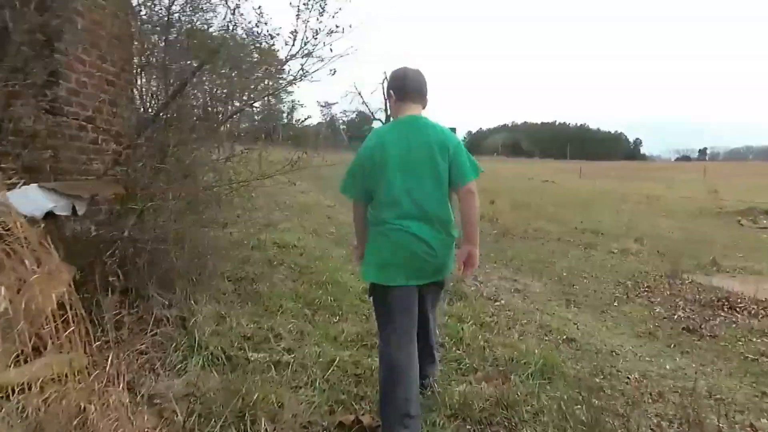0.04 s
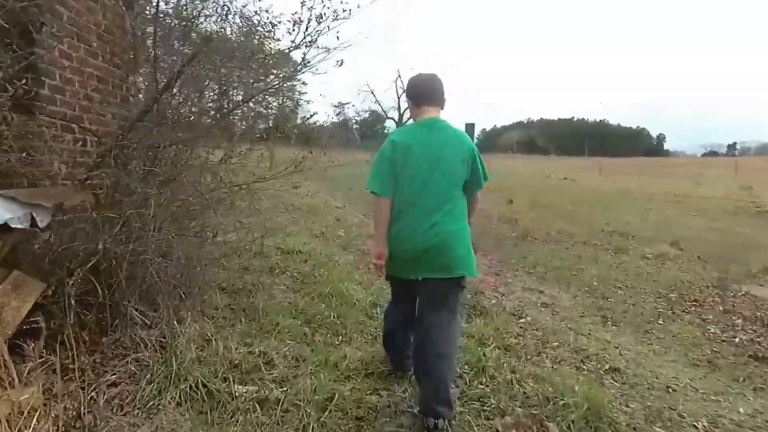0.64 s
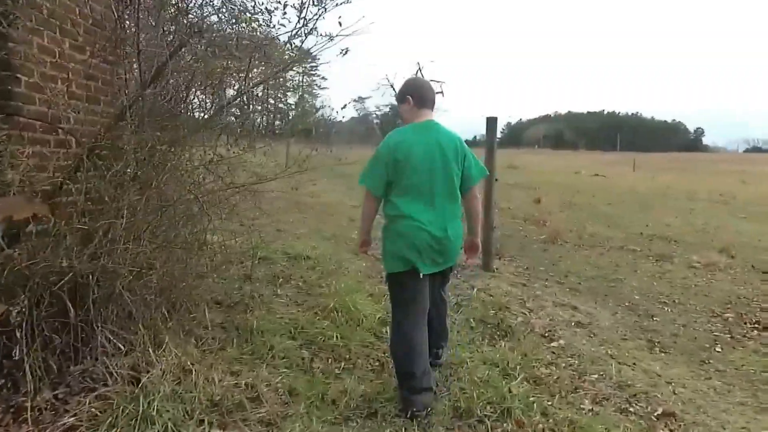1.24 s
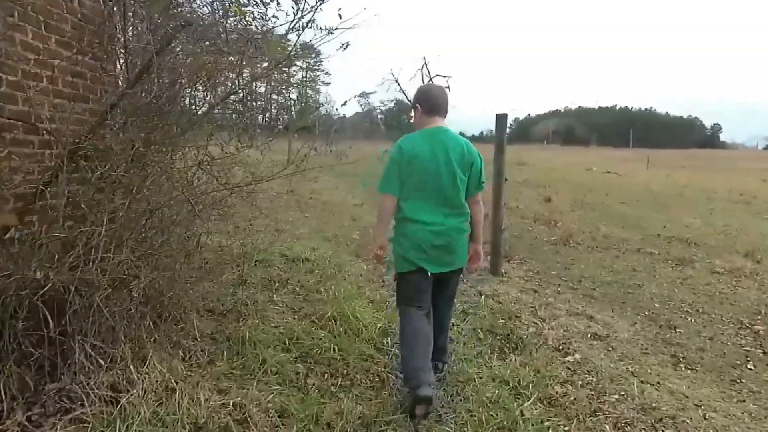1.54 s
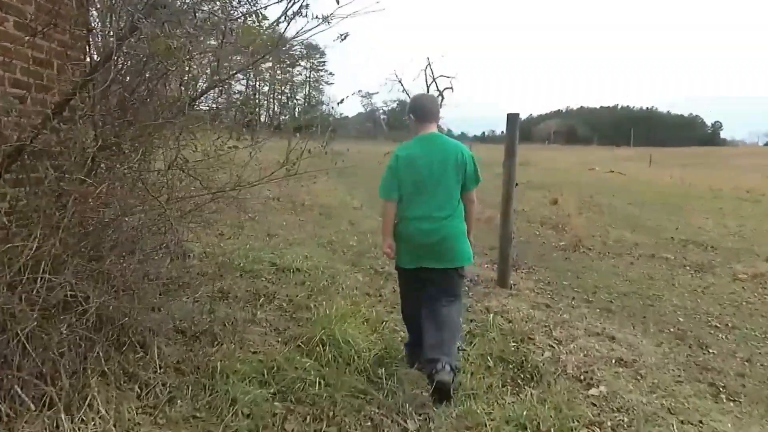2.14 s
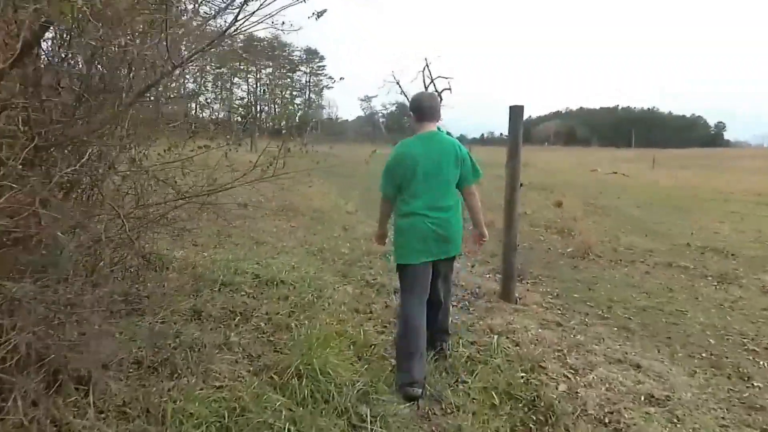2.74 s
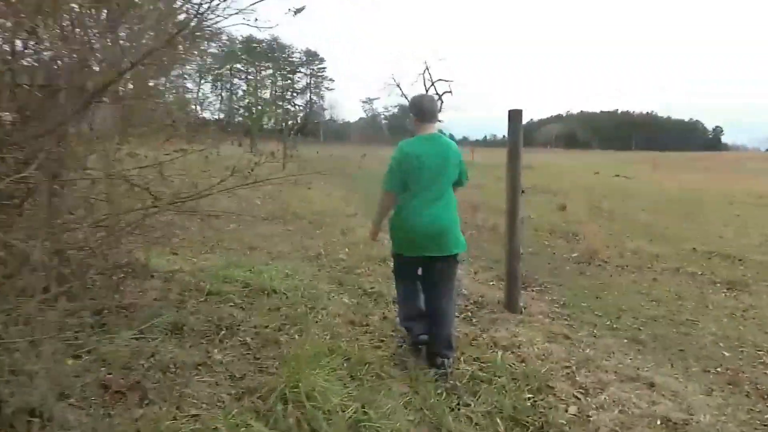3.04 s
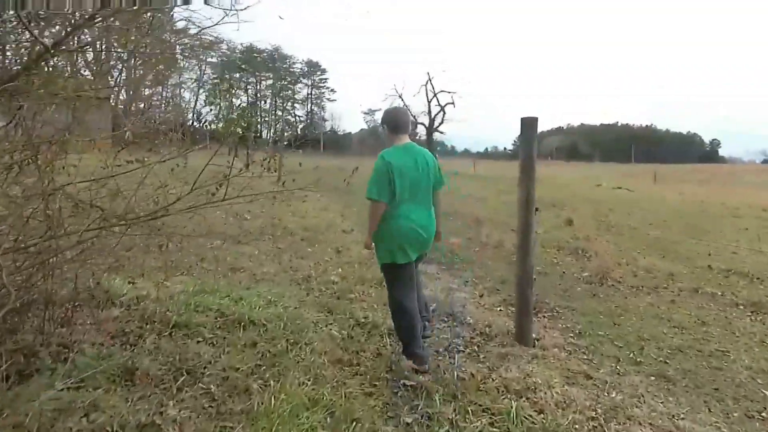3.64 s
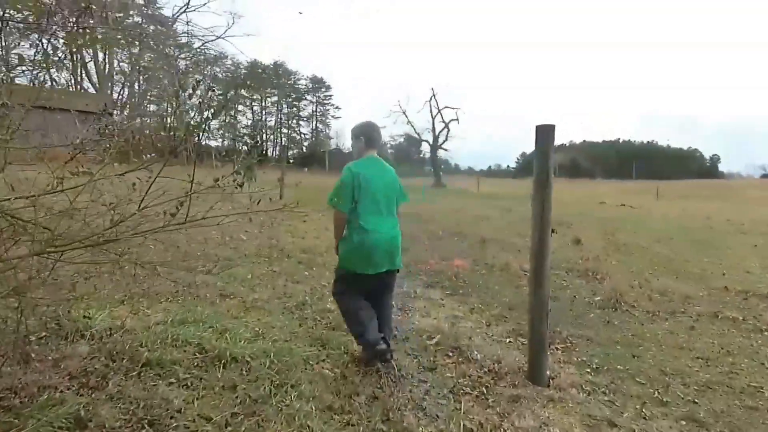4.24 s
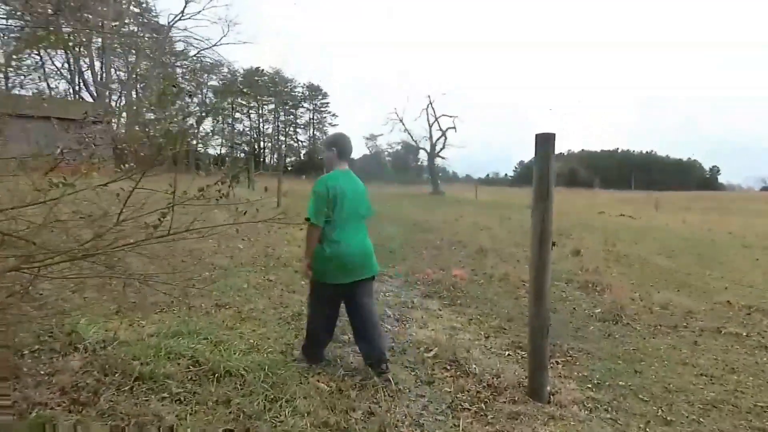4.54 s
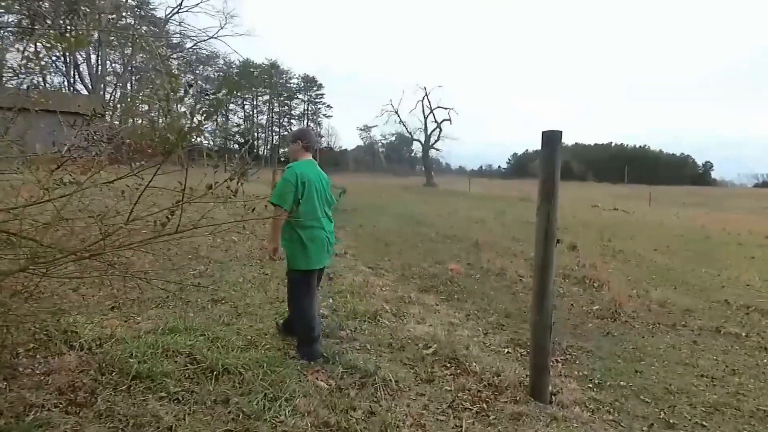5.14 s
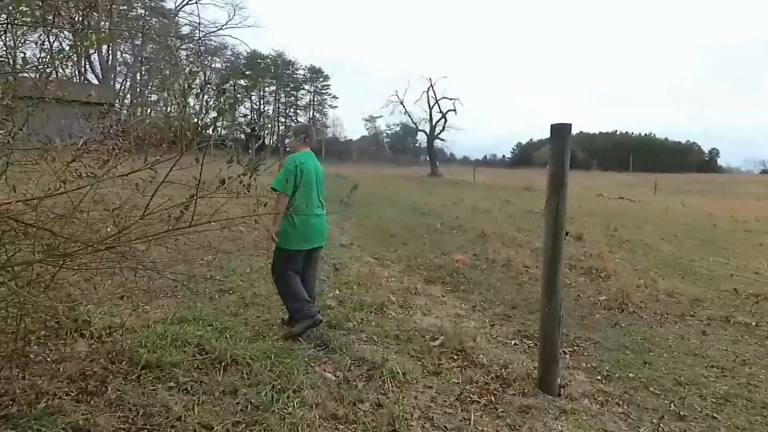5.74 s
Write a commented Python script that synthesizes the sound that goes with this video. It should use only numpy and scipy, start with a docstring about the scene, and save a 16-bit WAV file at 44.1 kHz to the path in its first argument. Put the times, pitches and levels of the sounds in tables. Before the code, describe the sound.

Someone walks slowly across a field, dry leaves and grass crunching underfoot close by on the right, a shoe squeaking briefly.

```python
"""A foot crunches into dry grass and fallen leaves: slow steps in an open field, the microphone of a
carried camera close to the ground. Each step crushes a dense mass of blades; leaves cave in, stalks
snap as the foot lifts and swings, and soles thud on the soil. In one step a shoe squeaks and creaks,
then a dry stem drags along it. The walk is all in the right channel; the left has only a faint hiss."""
import sys
import numpy as np
from scipy import signal
from scipy.fft import rfft, irfft, next_fast_len
from scipy.io import wavfile
from scipy.ndimage import map_coordinates

SR = 44100
rng = np.random.default_rng(int(sys.argv[2]) if len(sys.argv) > 2 else 0)


def int16_out(signal):
    """Quantize to a 16-bit WAV file."""
    q = np.round(np.clip(np.atleast_2d(signal).T, -1, 1) * 32767)
    wavfile.write(sys.argv[1], SR, q.astype(np.int16))


N = 264908

# bright spectrum of dry blades and leaves breaking close by: (frequency [Hz], relative level [dB])
LEAF_SPECTRUM = [(300, -34.5), (1000, -17), (2100, -6), (2900, -6.5), (3550, -8), (4800, -2), (6700, 0),
                 (10000, 0), (15000, -0.2)]
# dull spectrum of litter crushed under the sole: (frequency [Hz], relative level [dB])
SOLE_SPECTRUM = [(25, -31), (70, -13.5), (130, -5.5), (220, 1), (500, -0.5), (1000, -2), (1800, -6.5),
                 (3500, -6), (9000, -18.5)]


def footsteps():
    """More pressure breaks more blades a second, until single ticks merge into one dense crunch."""
    crunch_db, sole_db = tread() + 0.63 * wobble(35)  # the litter lies unevenly
    fractures_per_s = 5000 * amp(1.35 * (crunch_db + 18.5))
    grains = crackle(fractures_per_s, spread_db=4.5, life_s=0.00036)
    sliding = rng.standard_normal(N)  # blades sliding on the shoe
    clumps = unit(wobble(170) + wobble(70))  # blades give way in small bunches
    bright = coloured(grains + amp(1) * sliding, LEAF_SPECTRUM)
    bright = shifting_hollows(bright, treble_share=0.34, width_hz=299.4, life_s=.06)
    pressed = crackle(fractures_per_s * .3, spread_db=1.5, life_s=0.00045)
    dull = coloured(pressed + amp(-6.5) * grains + amp(3.5) * sliding, SOLE_SPECTRUM)
    dull = shifting_hollows(dull, treble_share=.6, width_hz=153.2, life_s=.04)
    dull_gain = amp(sole_db + 0.39 * clumps + 0.74 * wobble(60))
    return amp(crunch_db + 1.2 * clumps) * bright + dull_gain * dull


def tread():
    """Crunch and dull crush in dB: each foot brushes, presses, lands and fades, with swishes between."""
    # a foot bearing down:
    # (time [s], hold [s], crunch [dB], dull crush re crunch [dB], fade [dB/s], brushing beforehand [s])
    footfalls = [(0.002, .04, -20, -10, 140, 0), (.503, .156, -21, -12.5, 85, .097),
                 (1.21, .225, -21, -11.8, 170, .011), (1.9, .2, -22.5, -12.5, 380, .03),
                 (2.498, 0.2, -19.5, -15, 70, .035), (3.14, .203, -19.5, -13, 148, .014),
                 (3.832, .128, -19.5, -13, 75, .068), (4.427, .222, -17, -14, 78, .06),
                 (5.1, .105, -17.4, -12.5, 160, .055), (5.783, .157, -18.5, -12.4, 100, .05)]
    # a foot rolling off or swinging through the grass:
    # (time [s], hold [s], crunch [dB], dull crush re crunch [dB], fade [dB/s])
    swishes = [(.16, 0.085, -30.5, -11.5, 61), (.815, 0.052, -25, -13.5, 119),
               (.995, 0.056, -39, -9.5, 129), (1.642, .012, -33.5, -14.5, 300), (1.74, .04, -36, -12, 90),
               (2.136, .1, -26.5, -13, 63), (2.33, .02, -32, -17, 150), (2.796, 0.034, -22.5, -15, 150),
               (3.1, .015, -33, -11, 300), (3.422, 0.097, -26.5, -16, 260), (3.585, .11, -30.5, -9, 113),
               (4.092, 0.033, -25.5, -15.5, 250.5), (4.28, .03, -26.5, -12.5, 158),
               (4.816, 0.053, -24, -12.5, 480), (4.955, 0.041, -36.5, -7, 220),
               (5.323, 0.036, -21, -18, 180.5), (5.421, 0.055, -30, -13.5, 140),
               (5.689, 0.032, -32.5, -8.5, 100)]
    t = np.arange(N) / SR
    moves = [(db + stroke(s, hold, rise=350, fade=fade), dull) for s, hold, db, dull, fade in swishes]
    for s, hold, db, dull, fade, brush in footfalls:
        touch_db = stroke(s - brush, brush + hold, rise=1300, fade=fade)
        press_db = np.maximum(-8.5, stroke(s, hold, rise=260, fade=0))  # grazes the tips, then presses
        ease_db = 5 * np.maximum(t - s, 0)  # the litter packs down
        moves.append((db + touch_db + press_db - ease_db, dull))
    settle_db, settle_dull_db = -45, -51  # trodden litter springing back between steps
    crunch_power = amp(settle_db) ** 2 + sum(amp(db) ** 2 for db, dull in moves)
    sole_power = amp(settle_dull_db) ** 2 + sum(amp(db + dull) ** 2 for db, dull in moves)
    return 10 * np.log10(crunch_power), 10 * np.log10(sole_power)


def stroke(s, hold, rise, fade):
    """One movement in dB re its top, reached at time s; rise and fade are in dB a second."""
    t = np.arange(N) / SR - s
    return -rise * np.maximum(-t, 0) - fade * np.maximum(t - hold, 0)


def shifting_hollows(x, treble_share, width_hz, life_s):
    """Narrow hollows in the spectrum open and close as the foot shifts, most plainly below the treble."""
    hz, t, spectra = signal.stft(x, SR, nperseg=1024, noverlap=768)
    knots = rng.standard_normal((400, 400))
    field = map_coordinates(knots, np.meshgrid(hz / width_hz, t / life_s, indexing="ij"), mode="mirror")
    depth_db = 4.4 * np.interp(hz, [3500, 7000], [1, treble_share])[:, None]
    gain = amp(depth_db * (field - 0.27 * field ** 2))  # hollows go deeper than peaks rise
    gain /= np.sqrt(np.mean(gain ** 2, axis=1, keepdims=True))
    return unit(signal.istft(spectra * gain, SR, nperseg=1024, noverlap=768)[1][:N])


def leaf_crushes():
    """A whole leaf caves in with a tight swell of fractures."""
    # collapsing leaves: (middle time [s], relative level [dB], half length [s])
    collapses = [(0.02, -33, 0.0093), (0.191, -16.5, 0.0074), (0.316, -30, 0.0022), (0.65, -24.5, 0.0098),
                 (1.365, -24, 0.0053), (1.489, -27.5, .007), (1.991, -20.5, 0.006), (2.092, -21.5, 0.0072),
                 (2.939, -27.5, .003), (3.143, -21.5, 0.005), (3.646, -16.5, 0.0048),
                 (4.281, -25.5, 0.0078), (4.754, -23, 0.0043), (5.546, -33, 0.0043), (5.928, -13.5, 0.0055)]
    swell = sum(amp(db) * bump(s, half) for s, db, half in collapses)
    grains = crackle(5000, spread_db=-1, life_s=0.00029)
    return swell * (amp(2) * coloured(grains, LEAF_SPECTRUM) + amp(-11) * coloured(grains, SOLE_SPECTRUM))


def stalk_snaps(thin_per_s=12, tick_s=.0006, splinter_s=.003):
    """A stalk breaks with a sharp tick and a brief splintering; thin ones go at random."""
    # the loudest stalks breaking: (time [s], relative level [dB])
    loud = [(0.1445, -8), (0.994, -24), (1.1489, -26), (1.4935, -16), (1.5337, -23), (1.5964, -24),
            (1.6528, -22), (1.7025, -19), (2.0523, -15), (2.3312, -20), (2.3979, -20), (2.4583, -18),
            (2.7517, -15), (2.9417, -17), (3.0392, -24), (3.0898, -29), (3.9092, -12), (4.2439, -25),
            (4.2655, -21), (4.7586, -16), (4.8808, -16), (4.9365, -20), (5.0264, -23), (5.5384, -22),
            (5.6607, -27)]
    thin = [(rng.uniform(0, N / SR), rng.normal(-32, 1.5)) for _ in range(round(thin_per_s * N / SR))]
    track, t = np.zeros(N), np.arange(SR // 40) / SR
    for s, db in loud + thin:
        tick = rng.standard_normal(len(t)) * (np.exp(-t / tick_s) + .1 * np.exp(-t / splinter_s))
        tick *= np.sqrt(SR / 1000) / np.linalg.norm(tick)  # the energy of one millisecond at rms 1
        add(track, s, amp(db) * tick)
    return filtered(track, lambda hz: hz / np.hypot(hz, 2200))  # high-pass


def sole_thuds():
    """Each sole knocks the ground, then the soil settles in a short low rumble."""
    # heel and toe striking the soil: (time [s], relative peak [dB], pitch [Hz])
    blows = [(0.057, -43, 110), (0.188, -20.5, 160), (0.656, -31, 115), (1.259, -26, 200),
             (1.289, -31, 150), (1.357, -28.5, 139.9), (1.996, -23, 219), (2.097, -35, 83.8),
             (2.511, -36, 100), (2.694, -18, 161.1), (2.805, -24, 159.8), (3.165, -29, 140.6),
             (3.642, -23, 137), (3.925, -25, 190.3), (3.957, -21, 201), (4.454, -33, 75),
             (4.69, -29, 150.1), (5.107, -24, 150), (5.155, -25, 130), (5.338, -29.5, 149.2),
             (5.882, -35, 74.9), (5.93, -26, 200.5)]
    settling = sum(amp(db) * 130 / hz * bump(s + .006, 0.0095) for s, db, hz in blows)
    soil_spectrum = [(20, -17), (60, -16), (140, 1), (300, -5), (900, -38), (4000, -70)]
    rumble = coloured(rng.standard_normal(N), soil_spectrum)
    return amp(-5) * knocks(blows, cycles=0.59, sag=0.19, attack_s=0.00049) + amp(-13) * settling * rumble


def shoe_creaks(slips_per_s=99, scatter=0.24):
    """The flexing shoe sticks and slips in an uneven run of tiny knocks; now and then it knocks singly."""
    # course of the creak: (time [s], pitch [Hz], relative peak of a slip [dB])
    creak = [(2.222, 480, -31), (2.262, 960, -24), (2.278, 377, -21.5), (2.316, 229.2, -27.5)]
    # hollow knocks of the shoe: (time [s], relative peak [dB], pitch [Hz])
    hollow_knocks = [(0.045, -19, 1300), (1.809, -32, 330), (3.01, -32, 300), (3.609, -30.5, 281.4),
                     (3.685, -26, 279), (3.707, -23, 750)]
    s, hz, db = np.transpose(creak)
    at = np.arange(s[0], s[-1], 1 / slips_per_s)
    at += scatter / slips_per_s * rng.standard_normal(N)[:len(at)]
    slips = zip(at, np.interp(at, s, db), np.interp(at, s, hz))
    return knocks([*slips, *hollow_knocks], cycles=0.94, sag=0.45, attack_s=0.00058)


def shoe_squeaks():
    """The shoe rubs in a hollow squeak as it lands and squeaks faintly as it bends."""
    # two squeaks, each a list of (time [s], pitch [Hz], relative level [dB])
    squeaks = [
        [(1.855, 327, -36), (1.872, 454, -29.5), (1.886, 527, -22), (1.895, 533, -27), (1.915, 520, -42)],
        [(2.13, 581.5, -44.5), (2.19, 537, -43.5), (2.228, 547, -34), (2.245, 540, -50)],
    ]
    scuff_spectrum = [(100, -25), (280, -7), (1100, -9), (1600, -12), (5000, -30)]
    track = np.zeros(N)
    for squeak in squeaks:
        hz, db = curves(squeak)
        phase = 2 * np.pi * np.cumsum(hz * (1 + 0.0502 * wobble(280))) / SR
        tone = np.sin(phase) + amp(-9) * np.sin(2 * phase)
        scuff = coloured(rng.standard_normal(N), scuff_spectrum)
        track += amp(db) * during(squeak) * (tone + amp(-6.5) * scuff)
    return track


def stem_scrape():
    """A dry stem drags along the shoe and rasps in a narrow bright band."""
    # swell and fade of the drag: (time [s], relative level [dB])
    drag = [(2.45, -40), (2.47, -25.5), (2.495, -21.5), (2.53, -31), (2.59, -41)]
    (db,) = curves(drag)
    rasp_spectrum = [(3000, -36.5), (5500, -13), (7000, -5), (7900, -7), (9200, -17), (15000, -33)]
    rasp = coloured(crackle(2500, spread_db=1, life_s=0.00033), rasp_spectrum)
    return amp(db) * during(drag) * rasp


def hiss():
    """A faint steady noise floor behind the walk, strongest near 230 Hz."""
    # colour of the hiss: (frequency [Hz], relative level [dB])
    spectrum = [(25, -26), (55, -23), (110, -9), (230, 4.5), (400, -2), (900, -8), (2500, -10), (6000, -13),
                (15000, -16)]
    return amp(-57.5) * coloured(rng.standard_normal(N), spectrum)


def crackle(per_s, spread_db, life_s, size=96):
    """Tiny fractures: each a brief burst of its own strength and colour, steady in mean power."""
    chance = np.clip(per_s / SR, 1e-5, 1) * np.ones(N)
    at = np.flatnonzero(rng.random(N) < chance)
    strength = amp(spread_db * np.minimum(rng.standard_normal(N), 2))[at] / np.sqrt(chance[at])
    bursts = rng.standard_normal((len(at), size)) * np.exp(-np.arange(size) / (life_s * SR))
    samples = at[:, None] + np.arange(size)
    return unit(np.bincount(samples.ravel(), (bursts * strength[:, None]).ravel(), N + size)[:N])


def knocks(rows, cycles, sag, attack_s):
    """Soft, quickly damped swings whose pitch sags as they die."""
    track, t = np.zeros(N), np.arange(SR // 10) / SR
    for s, db, hz in rows:
        fade = np.exp(-t * hz / cycles)
        phase = 2 * np.pi * np.cumsum(hz * (1 + sag * (fade - .5))) / SR
        swing = np.sin(phase) * fade * (1 - np.exp(-t / attack_s))
        add(track, s, amp(db) * swing / np.abs(swing).max())
    return track


def amp(db):
    """Decibels to gain."""
    return 10 ** (np.asarray(db) / 20)


def unit(x):
    """Scale to rms 1."""
    return x / np.sqrt(np.mean(x ** 2) + 1e-20)


def bump(s, half_s):
    """A bell-shaped swell around time s."""
    return np.exp(-.5 * ((np.arange(N) / SR - s) / half_s) ** 2)


def during(rows):
    """True between the times of the first and last row."""
    t = np.arange(N) / SR
    return (t > rows[0][0]) & (t < rows[-1][0])


def curves(rows):
    """One value per sample for each column after the time."""
    s, *columns = np.transpose(rows)
    return [np.interp(np.arange(N) / SR, s, column) for column in columns]


def wobble(rate):
    """A smooth random curve, rate knots a second."""
    return map_coordinates(rng.standard_normal(int(N * rate / SR) + 4), [np.arange(N) * rate / SR])


def filtered(x, response):
    """Filter x by a gain given as a function of frequency."""
    size = next_fast_len(N + SR // 2)
    return irfft(rfft(x, size) * response(np.fft.rfftfreq(size, 1 / SR)), size)[..., :N]


def coloured(x, spectrum):
    """x shaped by (frequency [Hz], level [dB]) points, at rms 1."""
    points_hz, db = np.transpose(spectrum)
    return unit(filtered(x, lambda hz: amp(np.interp(np.log(hz + 1), np.log(points_hz), db))))


def add(track, s, sound):
    """Mix a sound into the track from time s."""
    part = track[max(round(s * SR), 0):][:len(sound)]
    part += sound[:len(part)]


def scene():
    """The walk close up on the right, faint hiss on both sides."""
    litter = footsteps() + leaf_crushes() + stalk_snaps() + stem_scrape()
    walk = litter + shoe_creaks() + shoe_squeaks() + sole_thuds()
    return np.array([hiss(), hiss() + amp(6.5) * walk])


def record(dry, top_hz=15450):
    """The camera rounds off the highest peaks and keeps nothing above its band limit."""
    rounded = dry / (1 + dry ** 4) ** (1 / 4)
    return filtered(rounded, lambda hz: hz < top_hz)


dry = scene()
out = record(dry)
int16_out(out)
```